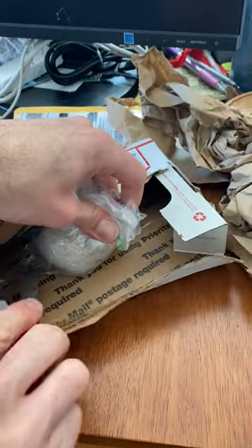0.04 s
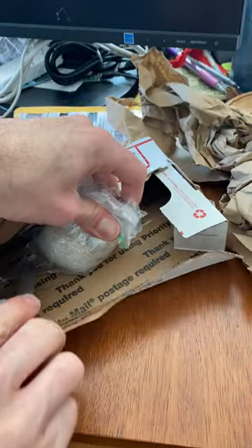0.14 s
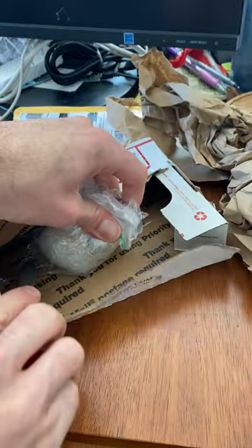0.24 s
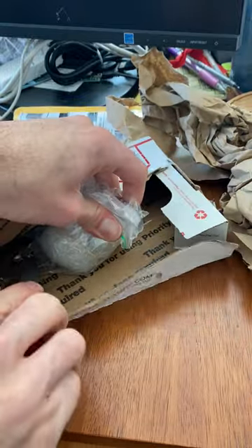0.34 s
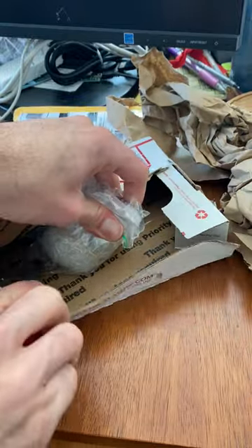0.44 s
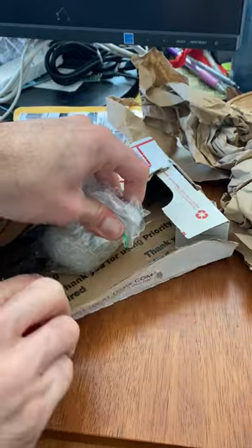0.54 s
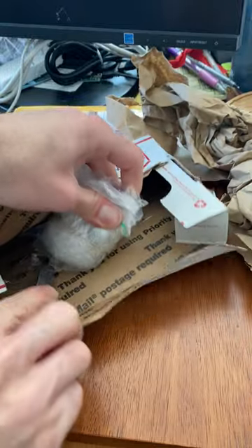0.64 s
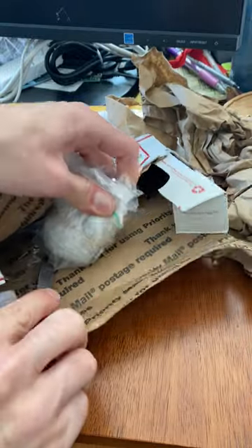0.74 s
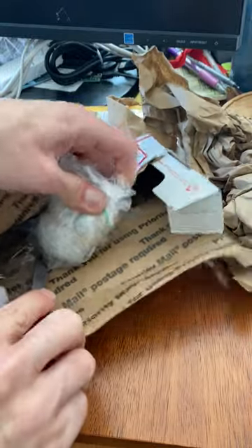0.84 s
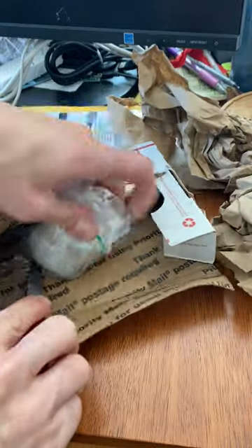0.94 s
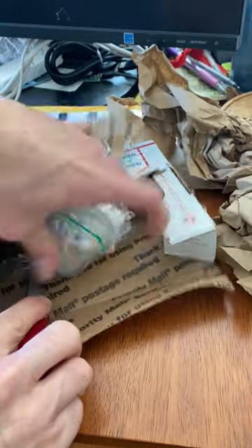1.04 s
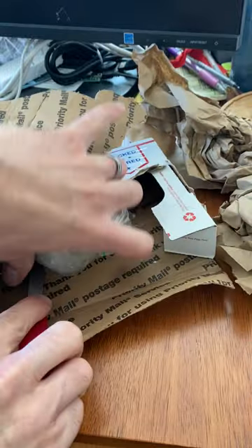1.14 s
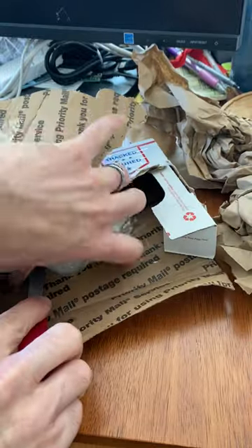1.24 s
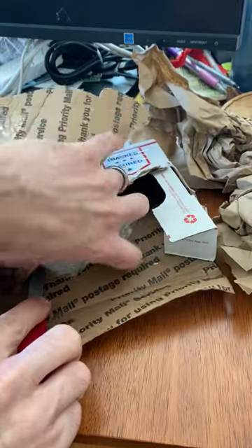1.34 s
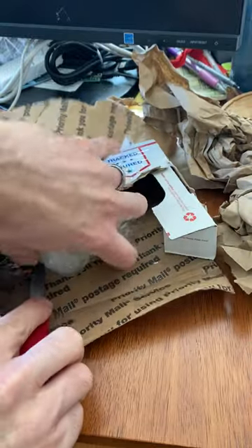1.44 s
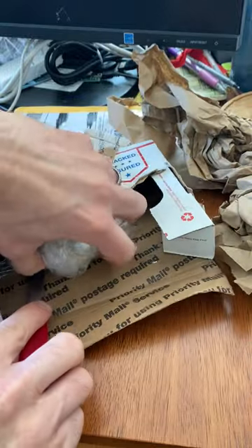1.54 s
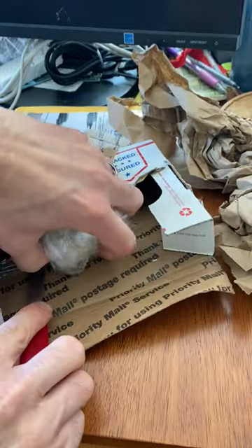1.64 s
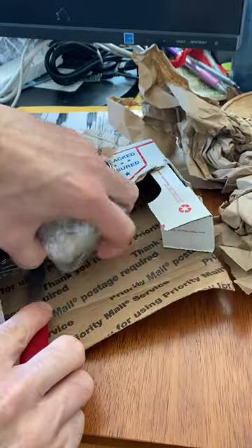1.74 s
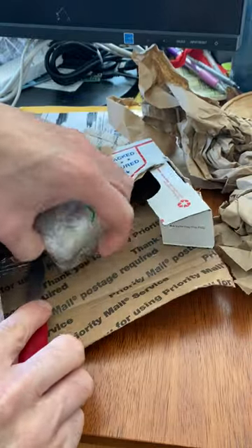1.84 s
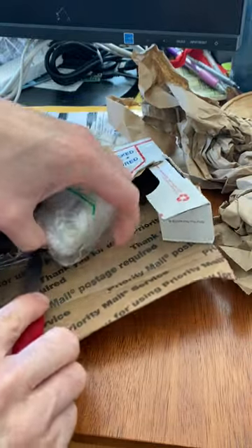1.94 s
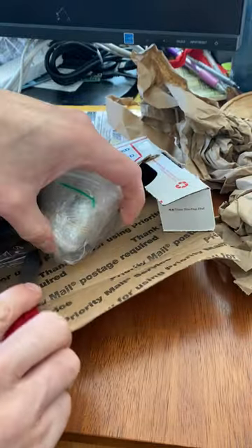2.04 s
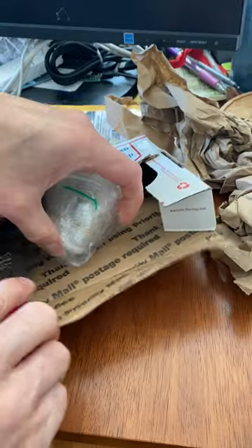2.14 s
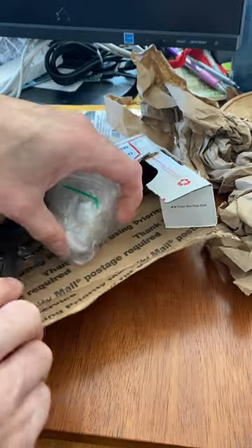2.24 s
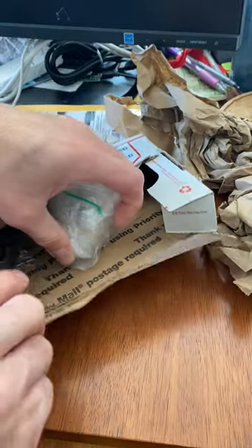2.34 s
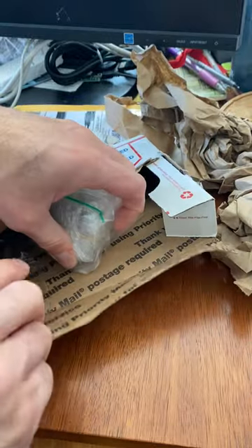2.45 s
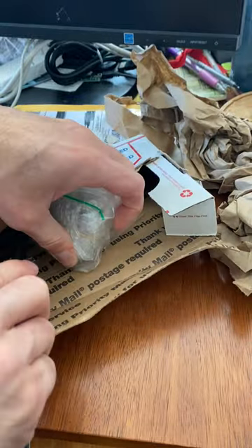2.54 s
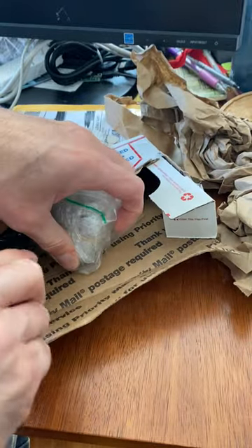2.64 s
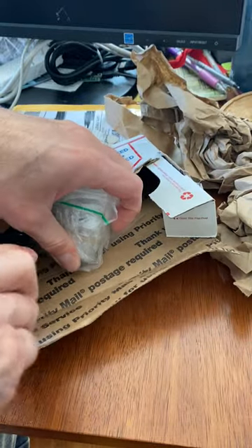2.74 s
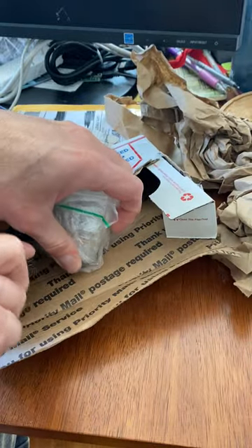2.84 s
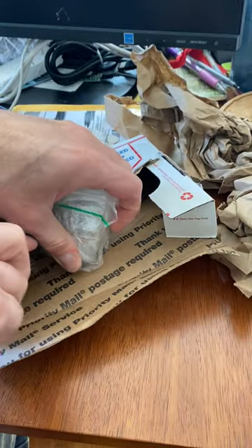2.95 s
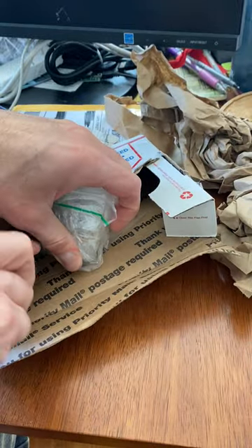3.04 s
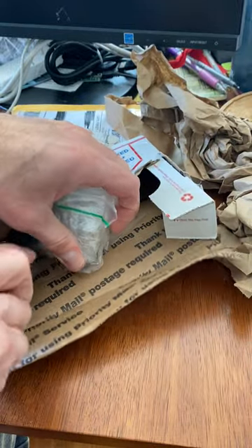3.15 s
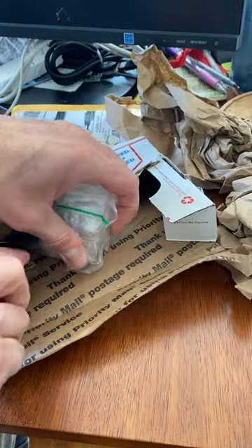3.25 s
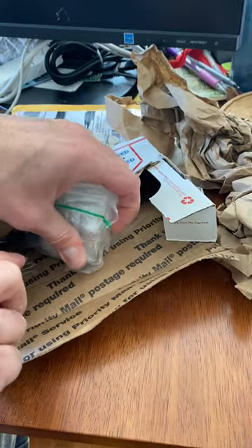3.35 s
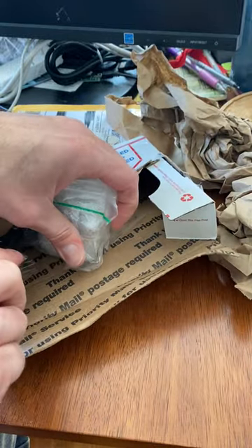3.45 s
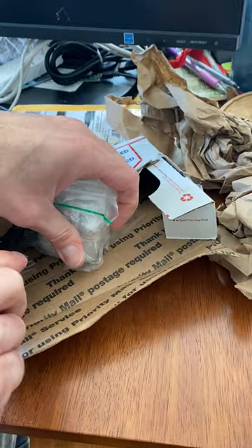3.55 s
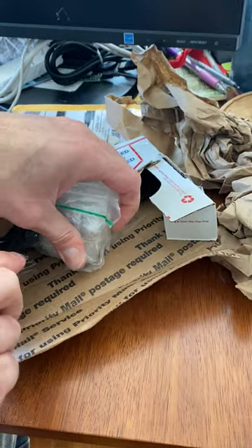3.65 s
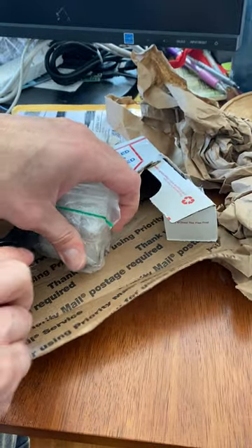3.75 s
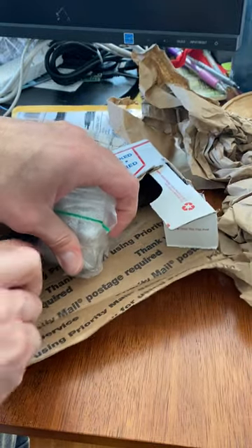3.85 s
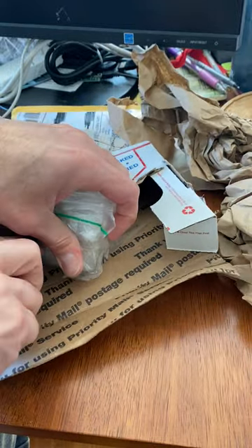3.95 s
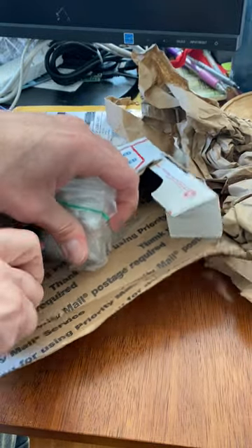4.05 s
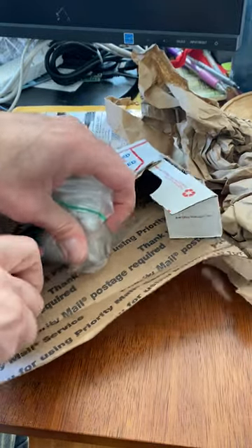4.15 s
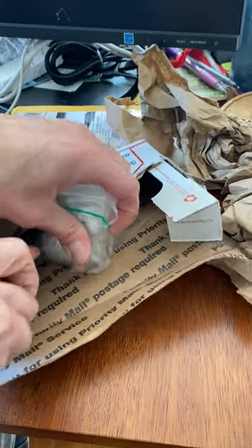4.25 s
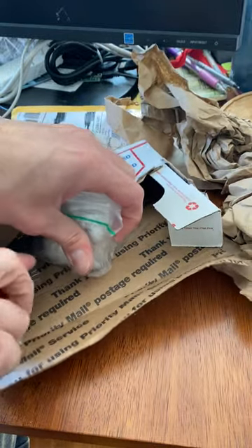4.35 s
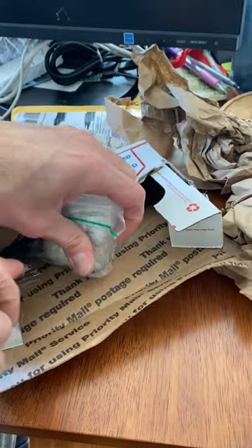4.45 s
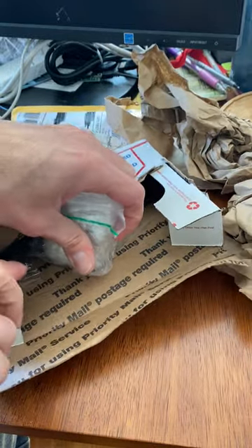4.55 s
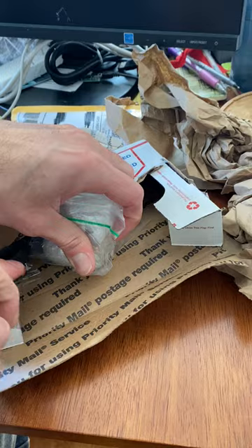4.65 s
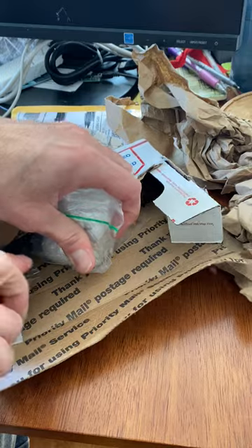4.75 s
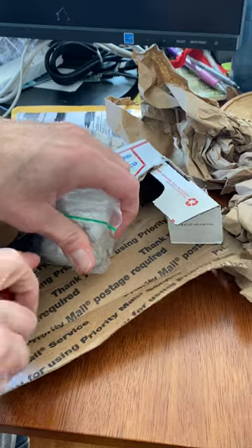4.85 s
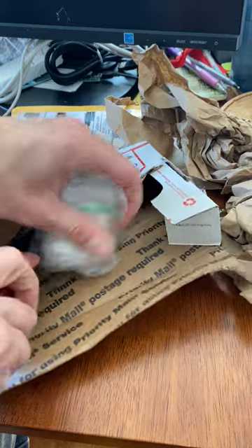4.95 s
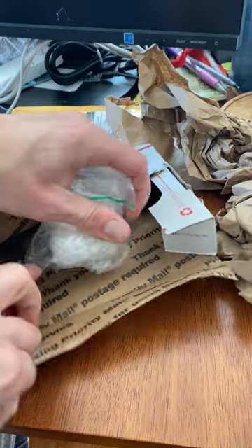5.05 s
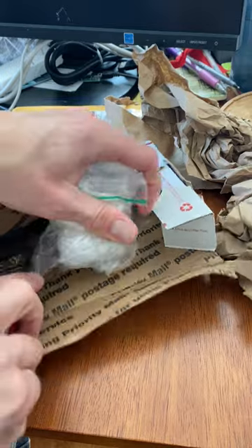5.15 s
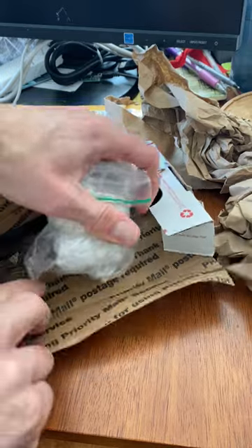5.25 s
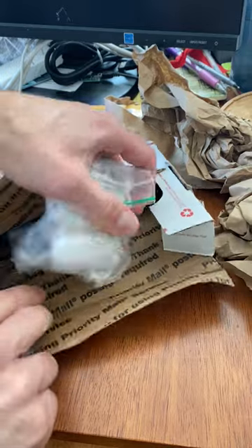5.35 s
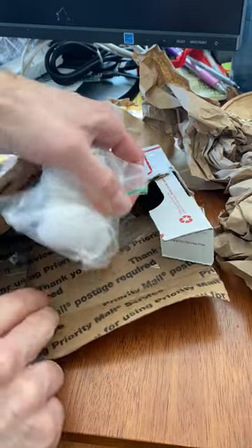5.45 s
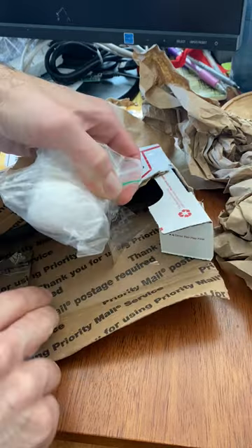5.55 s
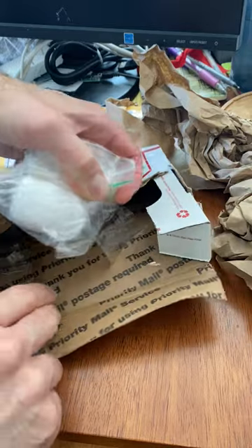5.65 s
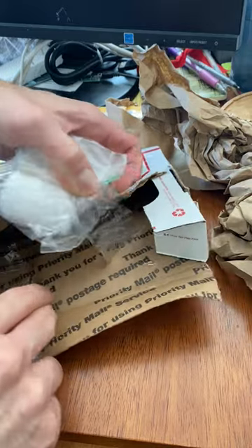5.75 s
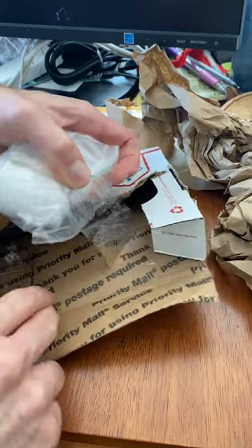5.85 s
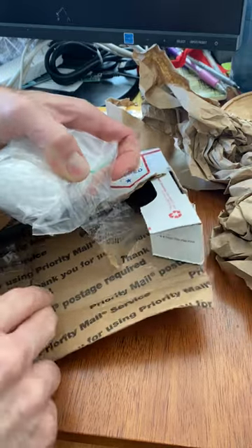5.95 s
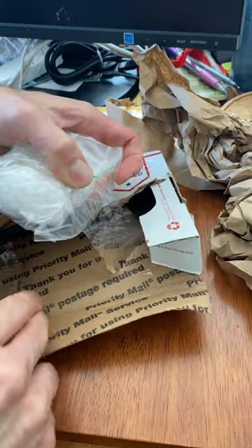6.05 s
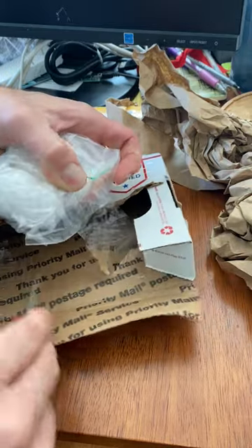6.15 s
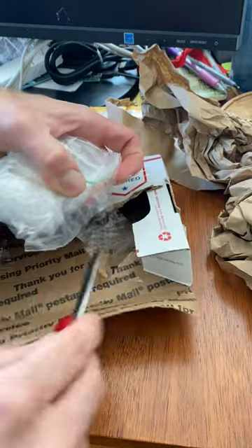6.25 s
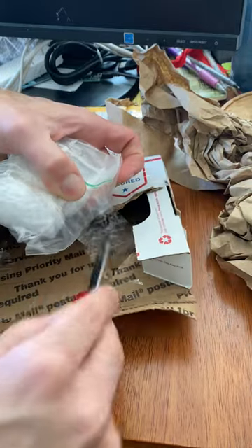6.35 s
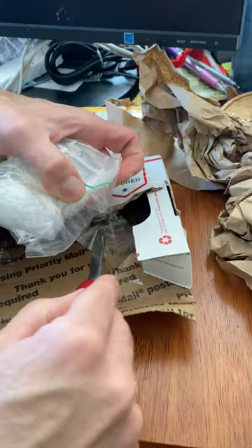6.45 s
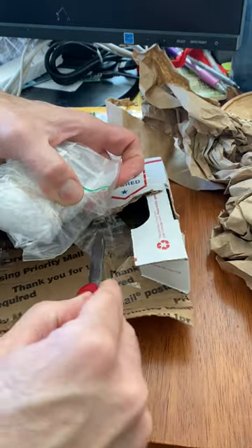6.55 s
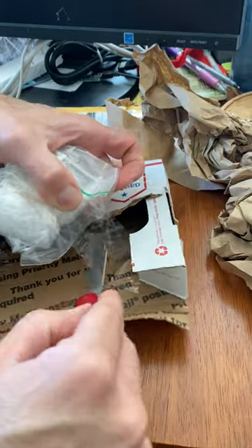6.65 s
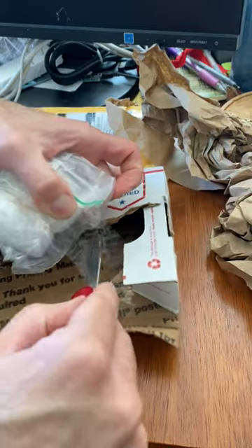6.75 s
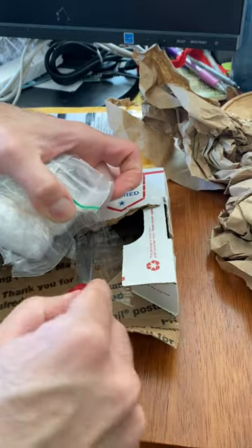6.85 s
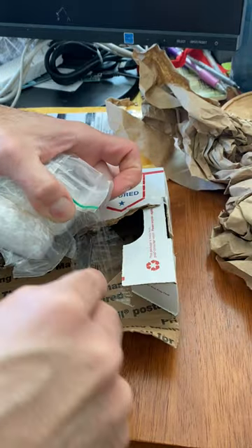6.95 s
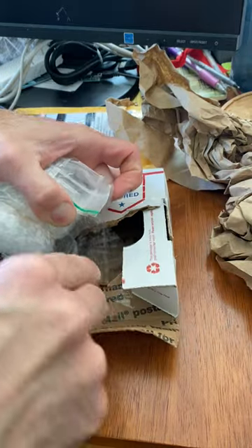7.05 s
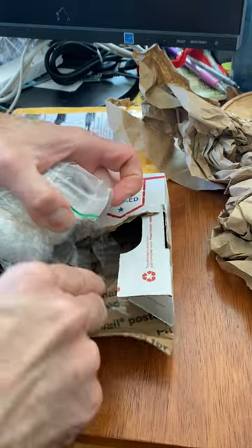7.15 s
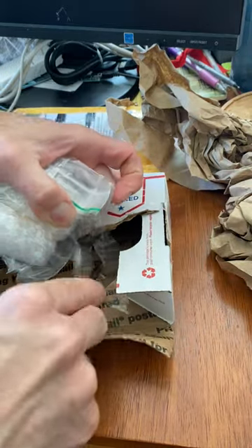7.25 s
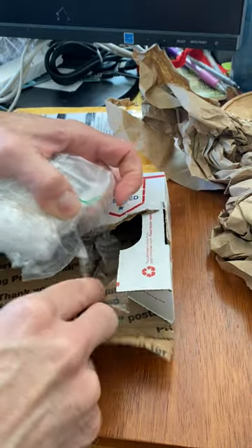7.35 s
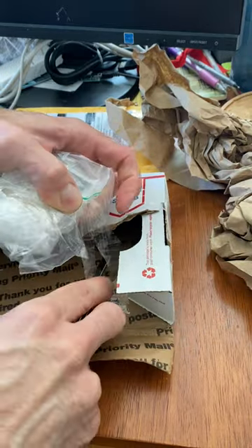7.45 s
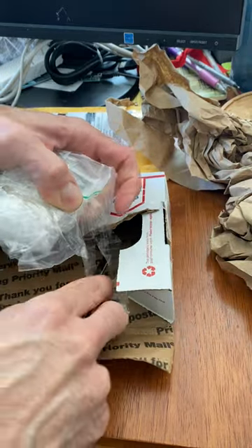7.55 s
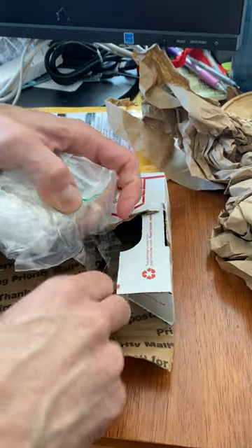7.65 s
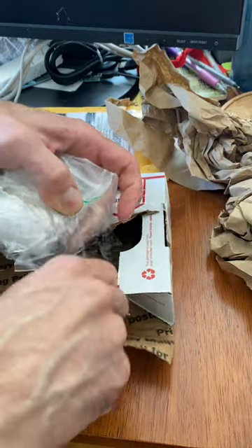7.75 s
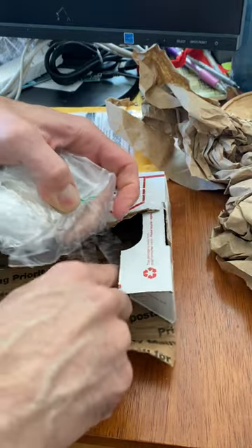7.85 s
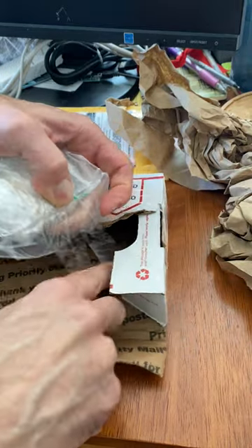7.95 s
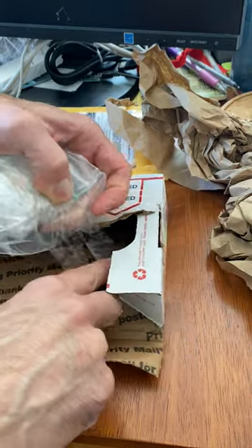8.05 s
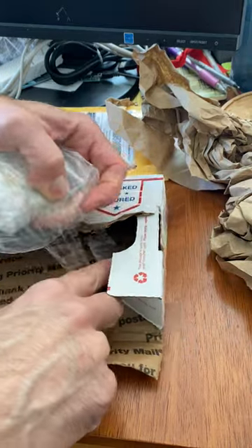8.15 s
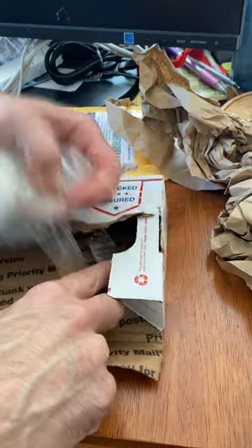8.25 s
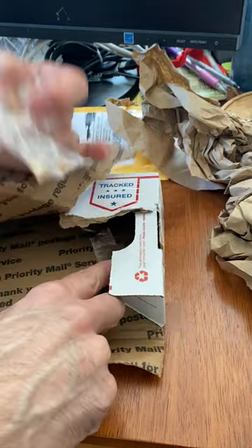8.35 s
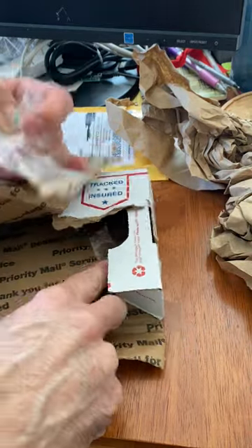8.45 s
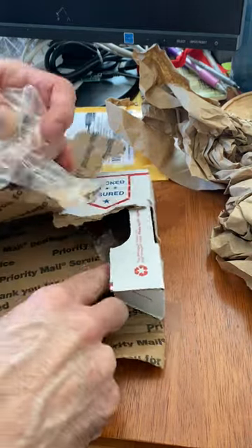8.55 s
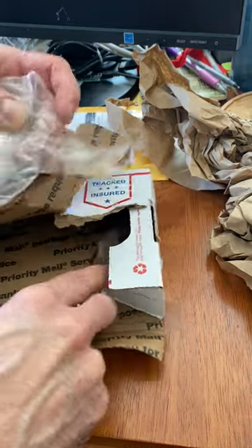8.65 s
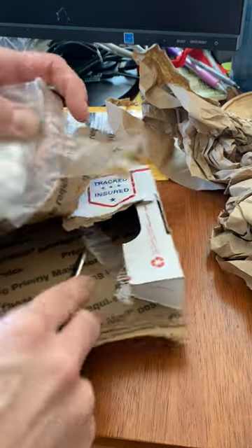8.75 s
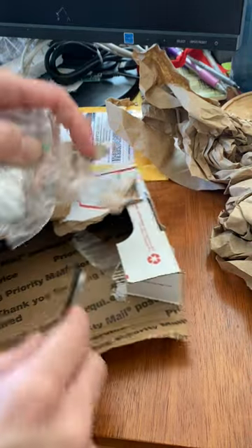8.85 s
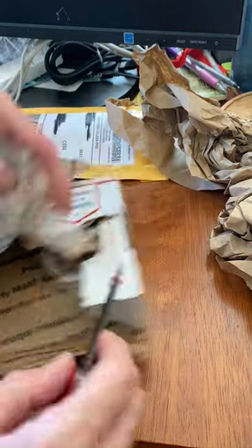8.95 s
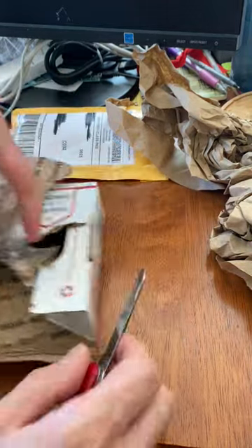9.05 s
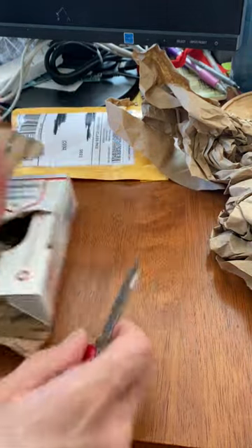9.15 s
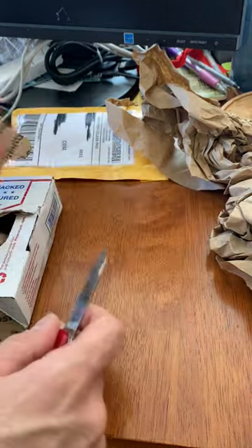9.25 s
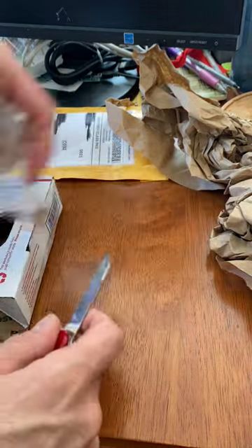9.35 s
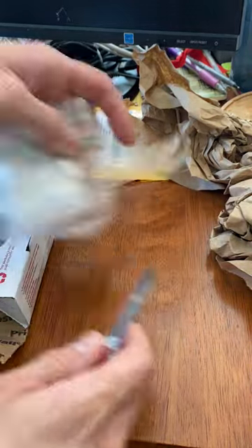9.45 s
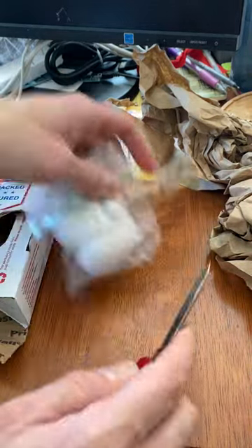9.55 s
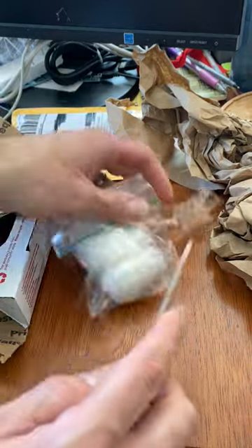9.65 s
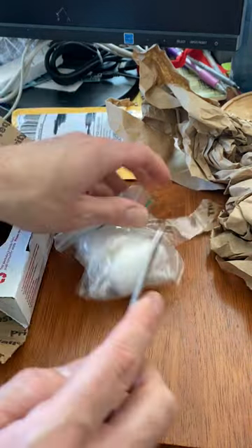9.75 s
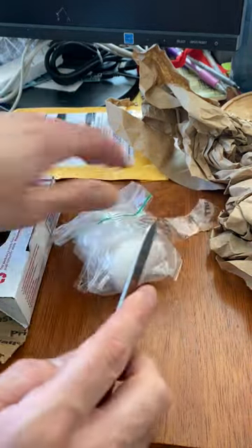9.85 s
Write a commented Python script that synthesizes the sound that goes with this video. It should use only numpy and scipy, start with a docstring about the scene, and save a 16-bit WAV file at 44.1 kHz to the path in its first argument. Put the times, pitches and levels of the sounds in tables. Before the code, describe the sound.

Hands work a crinkly taped plastic bundle free of a torn cardboard box, with sharp snaps, rustling pulls and dull bumps in a quiet humming room.

```python
"""A desk in a quiet, faintly humming room: hands work a taped plastic bundle loose from a torn cardboard box.
A phone lies close by and hears it through two microphone ports.
Creases and tape let go in snaps: a bright noise tick, a short crack of ringing modes, the duller ring of the card.
Many smaller random snaps over hissing friction noise make a rustle that swells with each pull.
A blade scrapes twice and the bundle slides free, both resonant friction noise; the box bumps in low damped tones."""
import sys
import numpy as np
from scipy import signal
from scipy.fft import rfft, irfft, next_fast_len
from scipy.io import wavfile
from scipy.ndimage import uniform_filter1d

SR = 44100
rng = np.random.default_rng(int(sys.argv[2]) if len(sys.argv) > 2 else 0)


def transcribe(u):
    """Save the signal u as a 16-bit wav file named by the first command-line argument.

    u: samples, shape (n,) or (channels, n), limited to [-1, 1]; the rate is SR.
    q: integer samples, one column per channel.
    """
    v = np.clip(np.atleast_2d(u).T, -1, 1)
    q = np.round(v * 32767).astype(np.int16)
    wavfile.write(sys.argv[1], SR, q)


N = 436149  # samples


def gain_of(db):
    """Decibels to amplitude gain."""
    return 10 ** (np.asarray(db) / 20)


def evened(x):
    """Scales to rms 1."""
    return x / np.sqrt(np.mean(x ** 2) + 1e-20)


def peaked(x):
    """Scales to peak 1."""
    return x / abs(x).max()


def drift(samples, size):
    """Slow random wander of rms 1: white noise averaged twice."""
    noise = rng.standard_normal(samples)
    return evened(uniform_filter1d(uniform_filter1d(noise, size), size))


def read(points, hz):
    """Reads a spectrum on a log-frequency axis."""
    f, value = np.transpose(points)
    return np.interp(np.log(hz + 1), np.log(f + 1), value)


def band(x, lo_hz, hi_hz):
    """Causal band-pass."""
    sos = signal.butter(3, [lo_hz, min(hi_hz, SR / 2.1)], "band", fs=SR, output="sos")
    return signal.sosfilt(sos, x)


def add(mix, start_s, sound):
    """Mixes a sound in at a time, cut off at the end of the mix."""
    part = mix[..., round(start_s * SR):][..., :sound.shape[-1]]
    part += sound[..., :part.shape[-1]]


# Colour of the empty room: freq_hz, relative_level_db (per Hz)
ROOM_AIR = [(30, -52), (58, 2.5), (86, -7), (121, -3), (189, -8), (239, -2.5), (273, -14), (554, -65),
            (16000, -73)]
AIR_DB = -54.5  # rms of the room noise
# Mains hum in the room: freq_hz, level_db (rms before the waver)
MAINS_HUM = [(59.5, -63), (119, -58.5), (178, -58.5)]


def air():
    """Room rumble and faint hiss as coloured noise, and mains hum wavering in level and phase."""
    hz, t = np.fft.rfftfreq(N, 1 / SR), np.arange(N) / SR
    spectrum = rfft(rng.standard_normal(N)) * gain_of(read(ROOM_AIR, hz))
    room = gain_of(AIR_DB) * evened(irfft(spectrum, N))
    for f, db in MAINS_HUM:
        waver = drift(N, 3000)
        tone = np.sqrt(2) * np.sin(2 * np.pi * f * t + 3.77 * waver)
        room += gain_of(db) * (1 + 0.32 * waver) * tone
    return room


# The box bumps the desk: start_s, level_db (peak), pitch_hz
BOX_BUMPS = [(0.283, -33, 288), (0.307, -37.5, 287), (0.985, -31.5, 164), (4.996, -31, 144),
             (8.311, -28.5, 116), (8.354, -26.5, 84), (8.376, -25, 189), (8.44, -33, 175),
             (9.157, -36, 187)]


def bumps():
    """Dull thuds of the box: each a low tone that swells briefly and is quickly damped."""
    out, t = np.zeros(N), np.arange(6000) / SR
    for start_s, db, hz in BOX_BUMPS:
        envelope = t * gain_of(-60 * t / 0.035)
        add(out, start_s, gain_of(db) * peaked(np.sin(2 * np.pi * hz * t) * envelope))
    return out


def swell(length_s):
    """Rise, hold and soft fall of one stroke or drag."""
    rise, fall = 0.17, 0.61  # shares of its length
    u = np.arange(0, 1, 1 / (length_s * SR))
    return np.minimum(u / rise, 1) * np.clip((1 - u) / fall, 0, 1) ** 2


def drags(rows, peaks):
    """Smooth friction noise through the resonances of what is dragged, swelling and fading."""
    hz, out = np.fft.rfftfreq(16384, 1 / SR), np.zeros(N)
    colour = sum(gain_of(db) / (1 + ((hz - f) / width) ** 2) for f, width, db in peaks)
    for (start_s, length_s, db), noise in zip(rows, rng.standard_normal((len(rows), 16384))):
        shape = swell(length_s)
        friction = evened(irfft(rfft(noise) * colour))[:len(shape)]
        add(out, start_s, gain_of(db) * shape * friction)
    return out


# The blade drags along the plastic: start_s, length_s, level_db (rms before the swell)
BLADE_SCRAPES = [(6.588, 0.063, -44), (6.705, 0.22, -47)]
# Resonances of the blade on plastic: freq_hz, width_hz, level_db (relative)
BLADE_PEAKS = [(900, 210, 0), (2030, 290, -1), (2820, 380, -1), (3700, 100, 4.5), (5000, 500, -17),
               (5950, 500, -5)]


def scrapes():
    """Blade on plastic: friction noise coloured by the resonances of the blade."""
    return drags(BLADE_SCRAPES, BLADE_PEAKS)


# The bundle slides out through its film: start_s, length_s, level_db (rms before the swell)
BUNDLE_SLIDES = [(5.826, 0.11, -31.5), (5.885, 0.16, -27.5)]
# Resonances of the taut film: freq_hz, width_hz, level_db (relative)
FILM_PEAKS = [(775, 190, -2), (2280, 320, -0.5), (3730, 260, 2.5), (5370, 530, -3.5)]


def slides():
    """Bundle sliding free: friction noise coloured by the resonances of its taut film."""
    return drags(BUNDLE_SLIDES, FILM_PEAKS)


def tilted(db, tilt_db):
    """Gains of crackle, card rustle and plastic fizz; the tilt leans from card towards plastic."""
    return gain_of([db, db - 4.5 - tilt_db, db + 1 + tilt_db])


# How hard the hands work the bundle: start_s, level_db (of the crackle band), tilt_db (card to plastic)
HAND_WORK = [(0.0, -57, -3.5), (0.52, -57, -2), (0.82, -52, -0.7), (2.07, -49, -3.5), (2.39, -56.5, -2.8),
             (3.41, -59.5, -4.5), (3.7, -64, -5.5), (3.8, -50.5, -11), (3.99, -50, -6), (4.71, -57, -3),
             (4.96, -45.5, -7), (5.84, -50, 1.3), (6.11, -52, -3), (6.27, -75, -8), (6.46, -64, -5),
             (6.94, -57, -2.5), (7.38, -60, -1), (7.68, -60.5, -6.5), (7.85, -53, -2.5), (8.32, -48.5, 2.5),
             (8.76, -57.5, -3.5), (8.9, -47, -3.5), (9.09, -51.5, -5.5), (9.36, -57.5, -2), (9.5, -60, -1),
             (9.55, -52.5, -3), (9.89, -57, -2.5)]


def handling():
    """Level of the steady handling, gliding from row to row, band by band."""
    start_s, db, tilt_db = np.transpose(HAND_WORK)
    t = np.arange(N) / SR
    return tilted(np.interp(t, start_s, db), np.interp(t, start_s, tilt_db))


# Pulls and rubs that swell out of the rustle:
# start_s, length_s, level_db (of the crackle band, at full swell), tilt_db (card to plastic)
HAND_STROKES = [(0.593, 0.72, -43, -2.5), (0.928, 0.16, -36.5, -2), (1.063, 0.21, -42, -5.5),
                (1.237, 0.062, -49, -12), (1.498, 0.19, -41, -2.5), (1.701, 0.076, -42.5, 1),
                (2.006, 0.057, -44, -5), (2.143, 0.22, -43, -5.5), (2.55, 0.45, -55.5, -8),
                (3.119, 0.23, -51, -6), (3.302, 0.17, -48.5, -8.5), (3.493, 0.17, -50.5, -16.5),
                (3.77, 0.26, -46.5, -2.5), (4.057, 0.15, -44, -3), (4.26, 0.33, -44, -5),
                (4.678, 0.12, -53, -10.5), (4.963, 0.18, -37, -4.5), (5.228, 0.12, -44, 0),
                (5.399, 0.083, -36.5, -1.5), (5.507, 0.39, -40.5, -3), (5.871, 0.22, -34.5, 2.5),
                (6.038, 0.056, -38.5, -5.5), (6.101, 0.16, -44, -3.5), (6.184, 0.13, -47, -6),
                (7.107, 0.17, -46, 5), (7.384, 0.15, -46.5, -0.5), (7.66, 0.13, -45, -3.5),
                (7.906, 0.26, -46.5, -3), (8.129, 0.1, -31.5, 0.5), (8.274, 0.14, -37, -3.5),
                (8.429, 0.047, -41.5, -20), (8.565, 0.29, -43.5, -2.5), (8.974, 0.14, -42, -2),
                (9.086, 0.26, -41, -6), (9.628, 0.089, -43, -3)]


def strokes(settling):
    """Level of the strokes and of the settling after snaps, added up in power, band by band."""
    power = np.zeros((3, N))
    for start_s, length_s, db, tilt_db in HAND_STROKES:
        add(power, start_s, (tilted(db, tilt_db)[:, None] * swell(length_s)) ** 2)
    return np.sqrt(power + settling)


def crackle(per_s, spread_db, clumps):
    """Small snaps at random moments, each crease with its own colour, a few larger than the rest."""
    creases = []
    for v in rng.standard_normal((150, 1003)):
        card_hz, crack_hz = 750 * 2 ** (0.041 * v[99]), 3000 * 2 ** (0.21 * v[98])
        part_gains = gain_of(1.34 * v[1000:, None, None])
        creases.append(part_gains * snap(v[:1000], card_hz, crack_hz))
    when, size, which = rng.random((round(per_s * N / SR), 3)).T
    size_db = spread_db * np.minimum(-np.log(size + 1e-9), 3)
    gains = gain_of(size_db) * clumps[(when * N).astype(int)]
    out = np.zeros((3, 2, N))
    for start_s, gain, k in zip(when * N / SR, gains, (which * len(creases)).astype(int)):
        add(out, start_s, gain * creases[k])
    return out


def sliding(patchy_db, flat, blur):
    """White noise through the blurred resonances of the sheet, its colour drifting as the grip changes."""
    hz, _, z = signal.stft(rng.standard_normal((2, N)), SR, nperseg=256)
    modes = CARD_MODES + CRACK_MODES
    peaks = sum(gain_of(db) / (1 + ((hz - f) * t60 / blur) ** 2) for f, db, t60 in modes)
    colour = flat * (1 + hz / 6000) + peaks
    patches = uniform_filter1d(rng.standard_normal(z.shape[1:]), 4, 0)  # across frequency
    patches = evened(uniform_filter1d(patches, 14, 1))  # along time
    shaped = z * colour[:, None] * gain_of(patchy_db * patches)
    return signal.istft(shaped, SR, nperseg=256)[1][:, :N]


def hiss(noise, lo_hz, hi_hz, same):
    """One band of noise, partly alike left and right."""
    a, b = band(noise, lo_hz, hi_hz)
    same = min(same, 1)
    return evened(np.array([a, same * a + np.sqrt(1 - same ** 2) * b]))


# Crack, card and tick bands as the two ports hear them:
# low_hz, high_hz, left_right_likeness (0-1), room_tail_db (re snap), tail_t60_s
PORT_BANDS = [(1360, 6250, 0.87, -18.5, 0.039), (342, 1264, 0.61, -37, 0.067), (5920, 14500, 1, -53, 0.064)]


def rustle(levels, rubs, tails, clump_db, grain_db, grit_db):
    """Clumped crackle over sliding hiss, gritty where surfaces rub hard; the snaps' room tails are hiss too."""
    clumps = gain_of(clump_db * drift(N, 300))
    soft = sliding(patchy_db=3.5, flat=0.2, blur=12.0)
    rasp = sliding(patchy_db=4, flat=0.2, blur=1.5)  # hard rubbing shows the resonances plainly
    grit = evened(gain_of(grit_db * drift(N, 40)))
    out = np.zeros((2, N))
    parts = crackle(per_s=350, spread_db=4.0, clumps=clumps)
    for part, level, rub, tail, share_db, (*edges, _, _) in zip(parts, levels, rubs, tails, grain_db, PORT_BANDS):
        grain_level = np.hypot(level, gain_of(-5) * rub)  # a stroke slides more than it crackles
        out += grain_level * gain_of(share_db) * evened(part)
        out += hiss(soft, *edges) * np.hypot(level * clumps ** 0.16, tail)
        out += hiss(rasp, *edges) * rub * clumps ** 0.31 * grit
    return out


def ring(modes, luck, rise_s, spread_db, detune, centre_hz, narrow_db):
    """A snap rings the sheet's modes with its own weights and tuning; higher modes build up more slowly."""
    t = np.arange(900) / SR
    hz, db, t60 = np.transpose(modes)[:, :, None]
    weight, tune, phase = luck.reshape(3, -1, 1)
    db = db - narrow_db * np.log2(hz / centre_hz) ** 2  # modes far from the centre are weaker
    tones = np.sin(2 * np.pi * hz * (1 + detune * tune) * t + 2 * phase)
    decay = gain_of(db + spread_db * weight - 60 * t / t60)
    rise = 1 - np.exp(-(t * centre_hz / hz / rise_s) ** 2)
    return (decay * tones * rise).sum(0)


# Ringing of the card: freq_hz (before detuning), level_db (relative), t60_s
CARD_MODES = [(319, 1.5, 0.013), (541, -4.5, 0.013), (701, -5, 0.016), (877, -6.5, 0.021),
              (1042, 6.5, 0.0058), (1332, -2, 0.015)]
# Ringing of the crack: freq_hz (before detuning), level_db (relative), t60_s
CRACK_MODES = [(1700, -4.5, 0.0044), (2276, 2.5, 0.0036), (2900, 0.5, 0.0037), (3710, 0, 0.0044),
               (4970, -1, 0.0073), (5680, -7, 0.011)]


def snap(luck, card_hz, crack_hz):
    """Crack, card ring and tick of one crease, each left and right: two sets of modes and a noise burst."""
    t = np.arange(900) / SR
    fade = t ** 2 * np.exp(-t / 0.00022) + 4e-6 * t * np.exp(-t / 0.0015)
    burst = luck[100:] + 0.25 * np.outer([1, -1], luck[:99:-1])
    tick = band(burst * fade, 4600, 15900)
    # each port hears the sheet from its own angle
    sides = luck[:36] + 0.15 * luck[36:108].reshape(2, -1)
    crack = [ring(CRACK_MODES, v[:18], rise_s=0.001, spread_db=3.5, detune=0.078,
                  centre_hz=crack_hz, narrow_db=11) for v in sides]
    card = [ring(CARD_MODES, v[18:], rise_s=0.0012, spread_db=0.5, detune=0.11,
                 centre_hz=card_hz, narrow_db=13.0) for v in sides]
    card = band(np.array(card), 152, 8800)
    return np.array([[peaked(v) for v in part] for part in (crack, card, tick)])


def fading(power, t60_s):
    """Lets each burst of power die away by 60 dB in t60_s."""
    return signal.lfilter([1], [1, -gain_of(-120 / t60_s / SR)], power)


# Close snaps that stand out:
# start_s, crack_db, card_db, tick_db (each peak), card_centre_hz, crack_centre_hz
CLOSE_SNAPS = [(0.024, -21.5, -30, -24, 830, 3370), (0.2185, -17.5, -26, -17, 1100, 4400),
               (0.281, -26.5, -25, -44.0, 900, 1650), (0.294, -29, -37, -29, 870, 3400),
               (0.332, -42, -38, -18.5, 850, 3740), (0.353, -23.5, -38, -28, 980, 3100),
               (0.3932, -30, -39, -34, 950, 3340), (0.4637, -41, -51, -20, 840, 4130),
               (0.476, -19, -40, -30, 840, 4900), (0.49, -5.5, -7, -8, 600, 3700),
               (0.532, -28, -27.5, -21, 850, 2900), (0.6315, -29, -31.5, -18, 554, 4760),
               (0.655, -29, -24.5, -30, 825, 2000), (0.6881, -41, -49, -11.5, 890, 4520),
               (0.743, -23.5, -26.5, -21, 990, 2020), (0.763, -22.5, -31, -25, 1030, 3770),
               (0.962, -23, -23, -10, 1070, 3530), (0.98, -31, -17, -35, 577, 2060),
               (1.012, -16, -23.5, -15, 800, 3860), (1.0556, -23, -23, -24, 1000, 2400),
               (1.1316, -16, -20.5, -13.5, 860, 2960), (1.1488, -20, -19, -14, 776, 4710),
               (1.1642, -21.5, -22.5, -22, 1020, 3150), (1.2278, -45, -26, -40, 1000, 2000),
               (1.2407, -25, -37, -16, 780, 4280), (1.263, -15, -24.5, -15.0, 990, 4030),
               (1.2731, -15, -27, -13, 875, 3740), (1.2807, -23, -40, -16, 960, 3780),
               (1.3542, -18.5, -33, -21, 1080, 3050), (1.3615, -20, -39, -30, 900, 3860),
               (1.3715, -31, -31, -17, 1000, 2700), (1.429, -19.5, -27, -17, 1120, 3060),
               (1.478, -30, -40, -20, 1040, 3300), (1.5029, -16, -19.5, -23, 1210, 3400),
               (1.53, -22, -41, -24, 1040, 3510), (1.5562, -17, -28, -12, 810, 3290),
               (1.5786, -10, -14, -4.5, 706, 3050), (1.599, -11, -12, -5, 860, 3330),
               (1.6863, -21.5, -29, -23.5, 1180, 1880), (1.793, -23, -33, -28, 834, 2490),
               (1.872, -22.5, -38, -20, 870, 2720), (1.933, -21, -45, -20, 1170, 3000),
               (2.0968, -22, -41, -18, 800, 2940), (2.1313, -23, -34, -16, 610, 4010),
               (2.171, -21.5, -39, -20, 990, 3000), (2.242, -27, -29, -16, 1020, 4380),
               (2.445, -31, -37, -32, 930, 1970), (2.6251, -22, -34, -21.5, 850, 3420),
               (2.669, -26.5, -29.5, -27, 970, 2320), (2.711, -31, -36, -27, 740, 3380),
               (2.748, -27.5, -29.5, -24, 1060, 1890), (2.85, -29, -30.5, -29, 725, 2710),
               (2.8804, -28.5, -42, -29, 800, 3370), (2.9392, -6.5, -9, -7, 840, 3120),
               (3.003, -18.5, -27.5, -22, 920, 2700), (3.04, -21.5, -24.5, -23, 940, 3250),
               (3.1627, -34, -29, -24, 820, 2630), (3.3023, -42, -38, -22.5, 830, 4570),
               (3.449, -31, -37, -26, 700, 2850), (3.4761, -30, -37, -23, 900, 3440),
               (3.501, -23, -20.5, -21, 680, 4920), (3.797, -29, -26.5, -25, 780, 3500),
               (4.016, -45, -26.5, -42, 605, 1700), (4.075, -24, -39, -30, 1100, 2970),
               (4.1173, -26, -30, -20.5, 930, 3610), (4.168, -15.5, -25, -22, 1030, 2560),
               (4.249, -27.5, -26, -41, 810, 3240), (4.2864, -25, -25.5, -17.5, 960, 4060),
               (4.413, -15, -28, -37, 790, 2970), (4.444, -35, -40, -33, 840, 4500),
               (4.4932, -38, -45, -20.5, 940, 4900), (4.499, -27, -35, -21, 730, 4560),
               (4.5067, -26, -25.5, -24, 820, 1840), (4.6105, -27, -49, -28, 960, 4900),
               (4.71, -25.5, -34.5, -32, 1060, 2960), (4.766, -26.5, -28.5, -21, 780, 4790),
               (4.869, -7.5, -9.0, -9, 855, 3580), (4.898, -24, -22.5, -23, 750, 2500),
               (4.916, -18, -25, -16, 700, 4500), (4.95, -9.5, -10.5, -2, 720, 3770),
               (4.9761, -4, -9, -5, 750, 2580), (4.9935, -5, -7.5, -1.5, 514, 2850),
               (4.9994, -19, -10, -26.5, 945, 2210), (5.0172, -30, -19, -26.0, 1070, 2940),
               (5.0366, -27, -11.5, -33.0, 730, 2680), (5.2354, -22.5, -25, -15, 850, 2240),
               (5.3139, -26, -24, -29, 830, 3600), (5.357, -23, -27, -12.5, 860, 4340),
               (5.407, -22, -36, -18, 1070, 5000), (5.416, -20, -27, -12, 670, 4890),
               (5.4228, -19, -40, -10, 830, 3590), (5.428, -14, -21, -16, 895, 3570),
               (5.501, -19.5, -31, -18, 810, 3870), (5.538, -20, -46, -23, 1200, 3560),
               (5.5492, -21, -21, -16, 716, 2630), (5.578, -16.5, -27.5, -14, 734, 2840),
               (5.625, -26, -24.5, -36, 1030, 3000), (5.654, -30, -22, -37, 634, 4800),
               (5.6796, -19, -31, -10.5, 860, 3130), (5.757, -28, -34.5, -21, 895, 2500),
               (5.889, -11.5, -32, -11, 870, 4170), (5.9354, -11.5, -24, -26, 870, 3140),
               (5.9479, -16.5, -19, -19, 744, 3580), (6.001, -22, -32, -17, 800, 4520),
               (6.1241, -16.5, -50, -17.5, 940, 4860), (6.2586, -26.5, -49, -25.5, 660, 3000),
               (6.4619, -14.5, -24.5, -13.5, 950, 3150), (6.5184, -28, -35, -15.5, 730, 4370),
               (6.8102, -15.5, -29, -17.5, 756, 3600), (6.8318, -23, -23, -14, 720, 3360),
               (6.844, -22.5, -31, -20, 770, 3190), (6.912, -23, -32.5, -23, 850, 4520),
               (6.931, -44, -52, -28, 900, 4500), (6.9953, -24.5, -36, -11, 820, 4300),
               (7.1121, -7.5, -9.5, -4, 740, 2450), (7.3924, -28.5, -56, -21, 930, 4870),
               (7.5814, -37, -25.5, -37, 750, 1830), (7.742, -19, -33, -22, 720, 3800),
               (7.787, -23.5, -40, -24, 820, 2920), (7.7973, -24, -25.5, -36.0, 680, 3000),
               (7.828, -29, -29.5, -25.5, 706, 2940), (7.8723, -19, -35, -18.5, 920, 2330),
               (7.9314, -31, -37, -19, 770, 3510), (7.9436, -25, -22.5, -35.5, 720, 3380),
               (7.975, -22, -49, -23, 1170, 2550), (7.9857, -17.5, -31, -7, 690, 5140),
               (8.0816, -22.5, -31, -25, 890, 2680), (8.1281, -16.5, -42, -18, 800, 2130),
               (8.1396, -2.5, -9, -1, 890, 2470), (8.174, -20, -28, -8.5, 960, 4260),
               (8.1975, -24, -50, -17, 900, 3500), (8.2893, -16.5, -40, -24, 1040, 4700),
               (8.303, -9, -15, -8.5, 1030, 2300), (8.3064, -0.5, -4, -4, 1090, 2330),
               (8.342, -17, -16.5, -31, 1210, 2050), (8.356, -28, -18, -35, 840, 2270),
               (8.3767, -30, -18.5, -34.5, 420, 2890), (8.4177, -28, -42, -20, 870, 3350),
               (8.4374, -7.5, -3.5, -15, 1000, 2270), (8.446, -13, -6.5, -39, 1100, 2120),
               (8.454, -21, -20, -42, 1200, 2300), (9.1395, -42, -21.5, -39, 524, 2920),
               (9.2436, -22.5, -18.5, -16, 780, 2930), (9.256, -25, -38, -20, 900, 5000),
               (9.372, -20.5, -22, -25, 1270, 1920), (9.547, -20.5, -25, -16, 605, 4640),
               (9.6196, -30, -34, -30, 1040, 2410), (9.7537, -23.5, -31.5, -23.5, 770, 2830),
               (9.781, -22, -35, -23, 660, 4070)]
# The sheet keeps rustling after a snap: one level_db (re snap) each for crack, card, tick
SETTLING_DB = [-28.5, -28.5, -34]


def snaps():
    """The standout snaps, the levels of their decaying room tails, and the power of the sheet settling."""
    out, power = np.zeros((2, N)), np.zeros((3, N))
    lucks = rng.standard_normal((len(CLOSE_SNAPS), 1000))
    for (start_s, *db, card_hz, crack_hz), luck in zip(CLOSE_SNAPS, lucks):
        parts = gain_of(db)[:, None, None] * snap(luck, card_hz, crack_hz)
        add(out, start_s, parts.sum(0))
        add(power, start_s + 0.0025, gain_of(db)[:, None] ** 2)
    tails = [gain_of(2 * db) * fading(p, t60_s) for p, (_, _, _, db, t60_s) in zip(power, PORT_BANDS)]
    settling = fading(power, t60_s=0.28) * gain_of(SETTLING_DB)[:, None] ** 2
    return out, np.sqrt(tails), settling


def scene():
    """Room air, bumps, slides, scrapes, rustle and snaps together."""
    single, tails, settling = snaps()
    rustling = rustle(handling(), strokes(settling), tails,
                      clump_db=3.5, grain_db=[2.5, 1.5, 1.2], grit_db=0.5)
    return air() + bumps() + slides() + scrapes() + rustling + single


# Balance of the two ports: freq_hz, left_re_right_db
PORT_BALANCE = [(60, 2), (150, -1.5), (380, -3.5), (950, -1), (2380, -1.5), (15000, 1)]
# The right port hears the treble late: freq_hz, lag_half_turns
PORT_LAG = [(0, 0), (4900, .06), (7420, 1), (13600, 3), (22050, 5.7)]


def record(dry):
    """Two microphone ports, treble lag on the right, mids leaning right; rounded peaks, then a band limit."""
    limit, edge_hz = 0.97, 16250  # the converter rounds off the tallest peaks
    size = next_fast_len(N + 1024)
    hz = np.fft.rfftfreq(size, 1 / SR)
    lean = gain_of(read(PORT_BALANCE, hz) / 2)
    lag = np.exp(-1j * np.pi * np.interp(hz, *np.transpose(PORT_LAG)))
    ports = irfft(rfft(dry, size) * np.array([lean, lag / lean]), size)[:, :N]
    rounded = limit * np.tanh(ports / limit)
    low_pass = signal.firwin(201, edge_hz, window=("kaiser", 9), fs=SR)
    return signal.oaconvolve(rounded, low_pass[None], "same")


dry = scene()
out = record(dry)
transcribe(out)
```